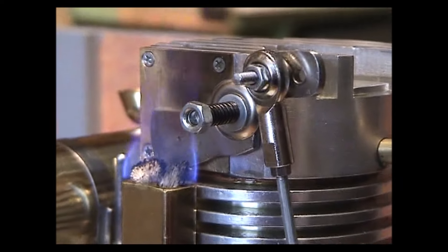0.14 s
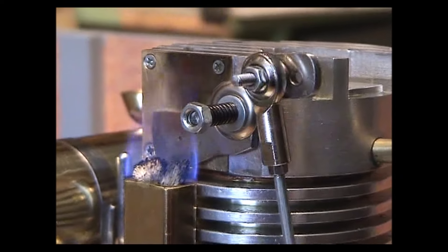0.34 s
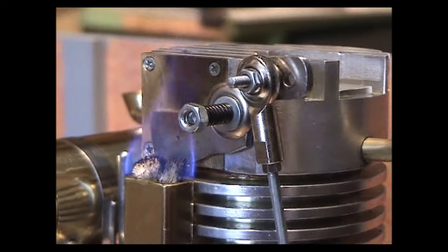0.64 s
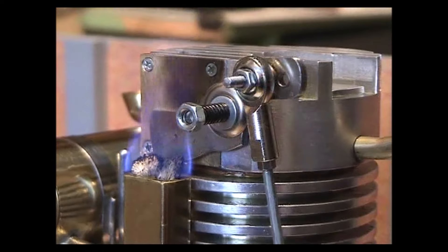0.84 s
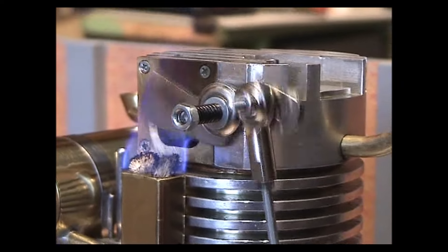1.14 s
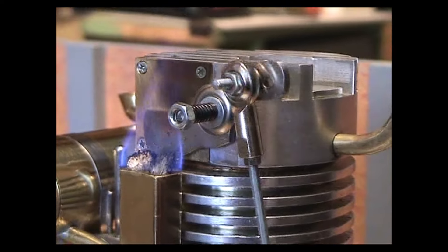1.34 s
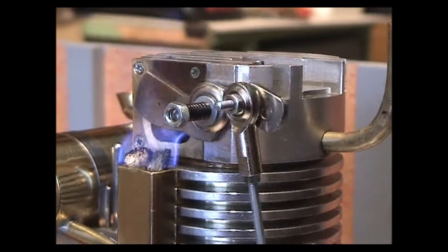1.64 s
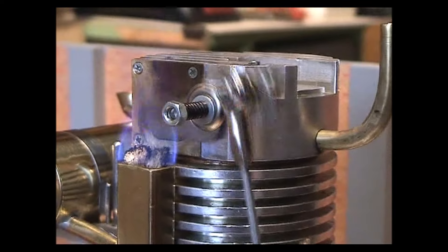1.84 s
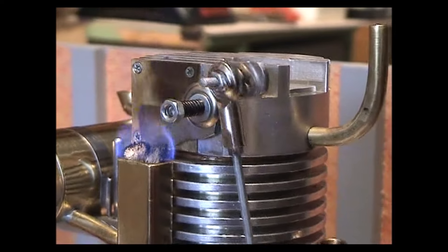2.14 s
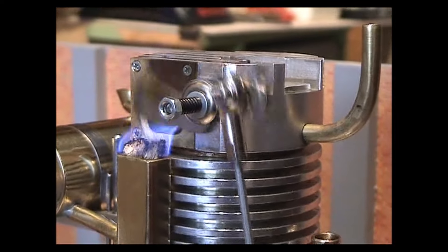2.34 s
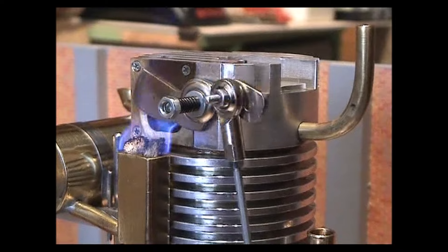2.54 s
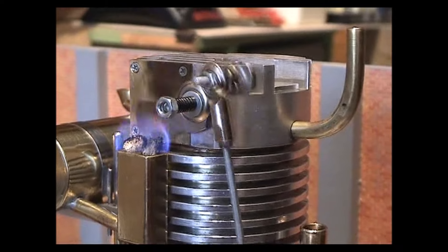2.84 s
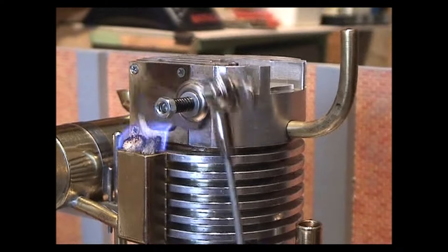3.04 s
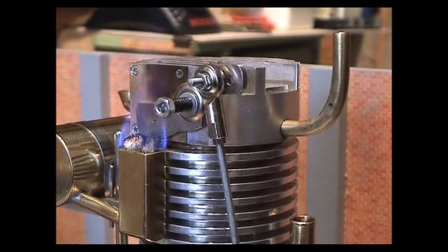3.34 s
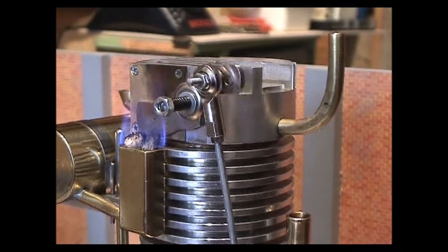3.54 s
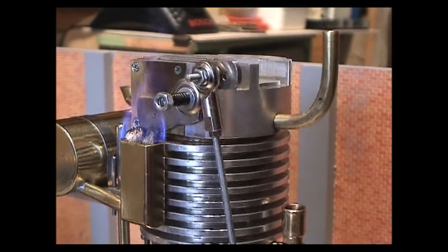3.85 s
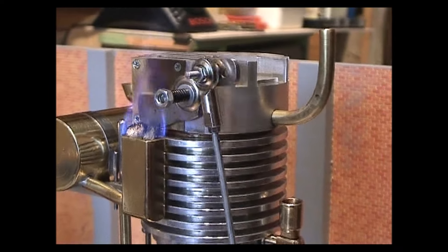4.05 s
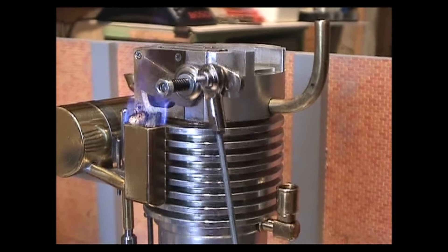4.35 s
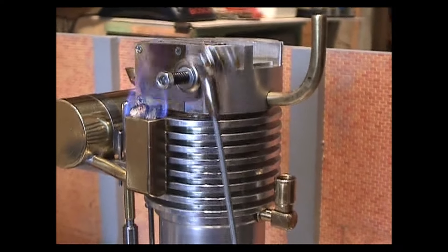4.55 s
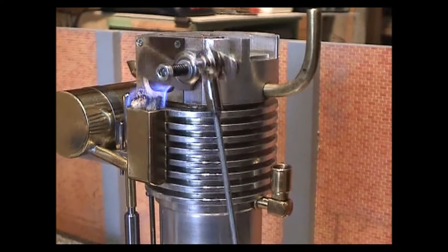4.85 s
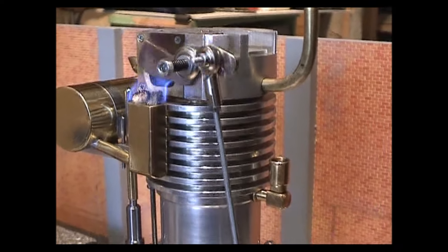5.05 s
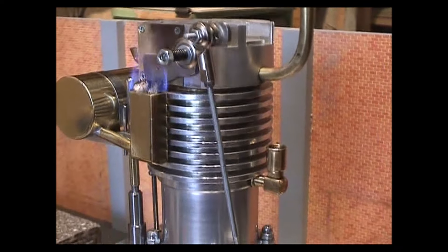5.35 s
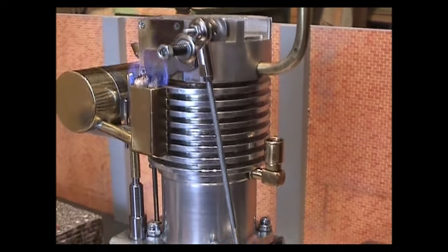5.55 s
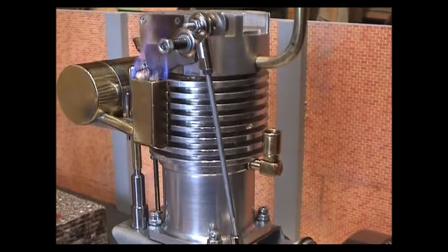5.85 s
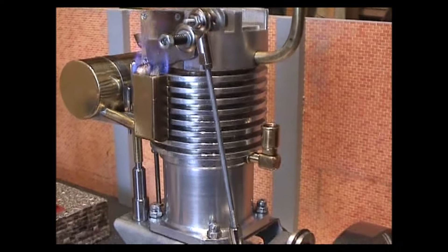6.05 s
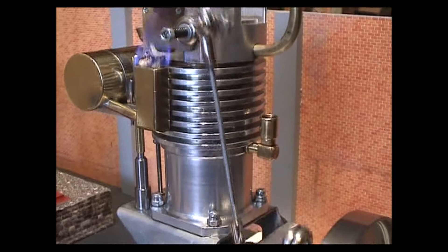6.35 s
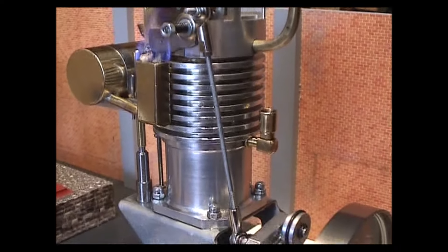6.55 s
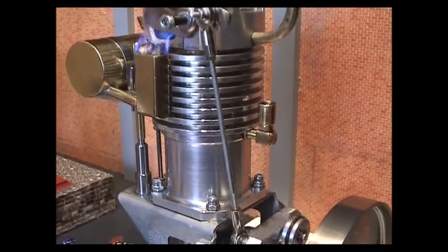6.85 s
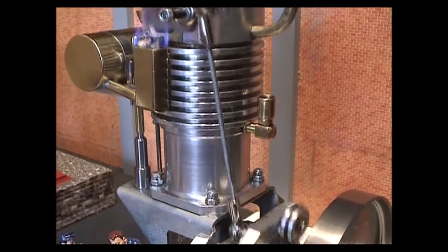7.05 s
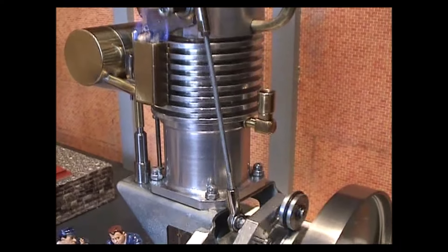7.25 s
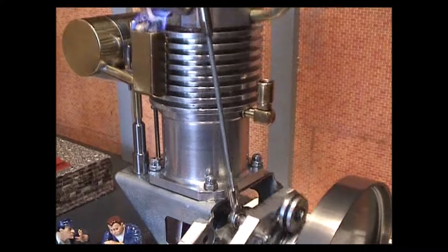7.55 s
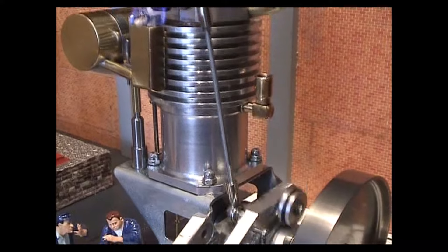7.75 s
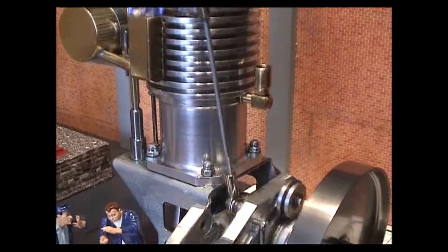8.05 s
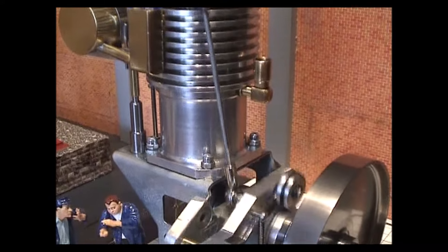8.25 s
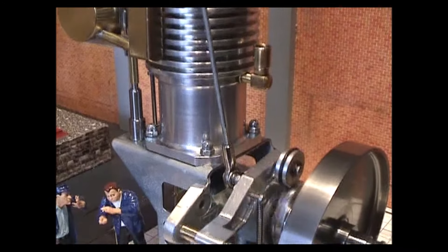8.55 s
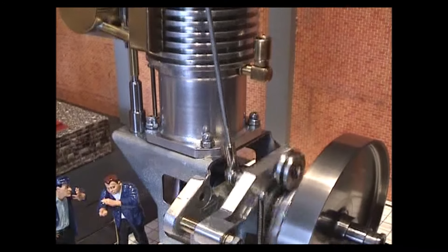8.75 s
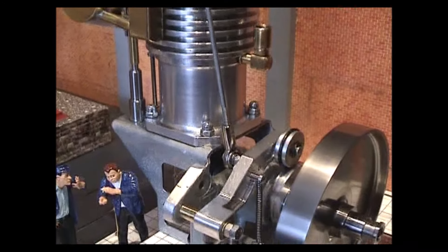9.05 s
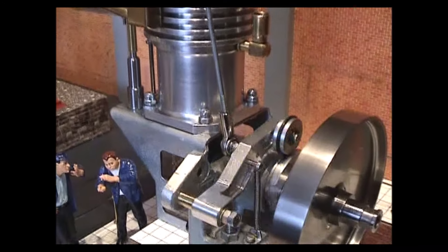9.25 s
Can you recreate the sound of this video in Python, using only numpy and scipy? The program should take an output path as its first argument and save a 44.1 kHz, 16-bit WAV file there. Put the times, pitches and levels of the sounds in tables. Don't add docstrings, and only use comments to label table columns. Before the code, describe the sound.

A small flame-sucking engine runs from start to end, close and dry in a quiet workshop. Each turn, a sharp steel valve click with a low puff alternates with a woody, metallic bearing knock, roughly four and a half cycles a second. Loose links tick faintly, air whoops softly in the port, and a tiny squeak follows. A small hard tap occasionally sounds on the bench.

```python
import sys
import numpy as np
from scipy import signal
from scipy.fft import rfft, irfft, next_fast_len
from scipy.io import wavfile
from scipy.ndimage import uniform_filter1d

SR = 44100
rng = np.random.default_rng(int(sys.argv[2]) if len(sys.argv) > 2 else 0)


def generate_wav(sig):
    pcm = np.round(np.clip(np.atleast_2d(sig).T, -1, 1) * 32767).astype(np.int16)
    wavfile.write(sys.argv[1], SR, pcm)


def invert_db(x):
    u = np.asarray(x, float) / 20
    return 10 ** u


N = 414981


def at_hz(points, hz):
    point_hz, value = np.transpose(points)
    return np.interp(np.log(hz), np.log(point_hz), value)


def rms_one(x):
    return x / np.sqrt(np.mean(x ** 2) + 1e-20)


def highpass(x, hz):
    return signal.sosfilt(signal.butter(2, hz, "high", fs=SR, output="sos"), x)


def lowpass(x, hz, order):
    return signal.sosfilt(signal.butter(order, hz, fs=SR, output="sos"), x)


def spikes(times_s, level_db):
    out = np.full(N, 1e-18)
    index = (np.asarray(times_s) * SR).astype(int)
    out[np.clip(index, 0, N - 1)] = invert_db(level_db)
    return out


def ring(x, hz, t60_s):
    r, w = invert_db(-60 / (t60_s * SR)), 2 * np.pi * hz / SR
    return signal.lfilter([0, np.sin(w)], [1, -2 * r * np.cos(w), r * r], x)


def pluck(x, hz, t60_s):
    return ring(ring(x, hz, t60_s), hz, t60_s) * 2 * np.e * np.log(1000) / (t60_s * SR)


def scatter(x, spread_s):
    r = np.exp(-1 / (spread_s * SR))
    swell = signal.lfilter([0, 2 * (1 - r) ** 1.403], [1, -2 * r, r * r], x)
    return swell * rng.uniform(-np.sqrt(3), np.sqrt(3), len(x))


def strike(times_s, level_db, modes, uneven_db, spread_s=0):
    out, luck = 0, rng.standard_normal((len(times_s), len(modes)))
    for k, (hz, mode_db, t60_s) in enumerate(modes):
        blows = spikes(times_s, level_db + mode_db + uneven_db * luck[:, k])
        if spread_s:
            blows = scatter(blows, spread_s)
        out = out + ring(blows, hz, t60_s)
    return out


def glides(times_s, level_db, hz, turns, rise_s, fall_s, octaves):
    t = np.arange(-3 * rise_s, 3 * fall_s, 1 / SR)
    shape = np.exp(-np.where(t < 0, t / rise_s, t / fall_s) ** 2)
    stretch_s = t + np.cumsum(2 ** (octaves * np.tanh(t / rise_s)) - 1) / SR
    out = np.zeros(N + len(t))
    for s, db, centre_hz, turn in zip(times_s, level_db, hz, turns):
        i = round((s + t[0]) * SR)
        out[i:i + len(t)] += invert_db(db) * shape * np.sin(2 * np.pi * (centre_hz * stretch_s + turn))
    return out[:N]


def resonate(x, peaks):
    out = 0
    for k, (hz, width_hz, level_db) in enumerate(peaks):
        r = np.exp(-np.pi * width_hz / SR)
        a = [1, -2 * r * np.cos(2 * np.pi * hz / SR), r * r]
        out = out + (-1) ** k * invert_db(level_db) * signal.lfilter([1 - r * r, 0, r * r - 1], a, x)
    return rms_one(out)


def flicker(rate_hz):
    points = rng.standard_normal(int(N / SR * rate_hz) + 2)
    return np.interp(np.arange(N) * rate_hz / SR, np.arange(len(points)), points) * 1.22


# hz, likeness_0_1
LIKENESS = [(30, 0.3), (200, 1), (1000, 0.14), (4000, 1), (14000, 0.44)]
PATCHY_DB = 2.2


def banded_noise(spectrum):
    out, edges_hz = 0, 22 * 2 ** np.arange(0, 9.6, .5)
    white = rng.standard_normal((2, 2, N))
    for k, (low_hz, high_hz) in enumerate(zip(edges_hz, edges_hz[1:])):
        hz = np.sqrt(low_hz * high_hz)
        if spectrum[0][0] < hz < spectrum[-1][0]:
            band = signal.butter(2, [low_hz, high_hz], "band", fs=SR, output="sos")
            mid, side = signal.sosfilt(band, white[k % 2])
            alike = np.clip(at_hz(LIKENESS, hz), 0, 1)
            stereo = np.sqrt(1 + alike) * mid + np.sqrt(1 - alike) * side * [[1], [-1]]
            out = out + invert_db(at_hz(spectrum, hz) + PATCHY_DB * flicker(40)) * stereo
    return rms_one(out)


# hz, level_db
FLOOR = [(15, -52), (25, -50), (127, 8), (334, 0), (394, -3), (632, -9), (839, -2.5), (1700, -6.5),
         (7000, -18), (9100, -48), (15400, -120)]


def room_air():
    return invert_db(-51) * banded_noise(FLOOR)


# time_s, crank_turns
CRANK = [(-.0736, -1), (.5855, 2), (.9262, 3.5), (1.2732, 5), (2.0868, 8.5), (2.9991, 12.5), (3.4446, 14.5),
         (4.0103, 17), (4.3555, 18.5), (4.8079, 20.5), (6.0311, 26), (7.2821, 31.5), (7.7535, 33.5),
         (8.3604, 36), (8.9481, 38.5), (9.2917, 40), (9.6282, 41.5)]


def crank_times(turn):
    s, turns = np.transpose(CRANK)
    times_s = np.interp(np.arange(turns[-1]) + turn, turns, s)
    return times_s[times_s < N / SR]


def cycle(times_s, usual, odd):
    mean, spread = np.transpose(usual)
    rows = np.c_[times_s, mean + spread * rng.standard_normal((len(times_s), len(usual)))]
    for row in odd:
        rows[np.argmin(abs(times_s - row[0])), :len(row)] = row
    return rows


# crank_turn_0_1, port_db, rub_db, hiss_db
TURN = [(0, -36, -25.5, -32.5), (0.022, -44.5, -40, -50), (.1, -36, -38.5, -50), (.2, -38.5, -45.5, -61.5),
        (0.239, -37, -41, -56), (.36, -43, -49.5, -92), (.49, -44.5, -41.5, -48.5), (.7, -45, -63.5, -64),
        (1, -50, -46, -64)]
# hz, width_hz, level_db
PORT = [(622.5, 17.6, 3.5), (690.8, 78.5, 2.5), (517, 104, -6.5)]
# hz, width_hz, level_db
RUB = [(256, 155, 5), (321, 9.1, -12), (935, 50, 2), (1162, 256, 0), (1447, 127, 1.5), (2006, 94, -3.5),
       (2390, 1360, -12), (2910, 16, -7.5)]
# hz, level_db_per_hz
HISS = [(1470, -54), (2500, 1), (3130, -1.5), (3770, -1.5), (6110, 3.5), (10000, -7), (14800, -22),
        (16000, -37)]


def running(knock_s):
    s = np.r_[2 * knock_s[0] - knock_s[1], knock_s, 2 * knock_s[-1] - knock_s[-2]]
    angle = np.interp(np.arange(N) / SR, s, np.arange(len(s))) % 1
    turn, *levels = np.transpose(TURN)
    port_db, rub_db, hiss_db = [np.interp(angle, turn, db) for db in levels]
    grain_db = 2.2 * np.minimum(rng.exponential(1, N), 3)
    grit = (rng.random(N) < 2500 / SR) * invert_db(grain_db) * rng.choice([-1, 1], N)
    air = invert_db(port_db) * resonate(rng.standard_normal(N), PORT)
    bearing_hum = invert_db(-58) * resonate(rng.standard_normal(N), RUB[4:6] + RUB[7:])
    return air, invert_db(rub_db) * resonate(grit, RUB) + bearing_hum, invert_db(hiss_db) * banded_noise(HISS)


# mean_db, spread_db
USUAL_VALVE = [(-15.5, -0.45), (-31.5, 2.5), (-30, 1)]
# start_s, click_db, tock_db
ODD_VALVES = [(0.0365, -15, -20), (.255, -12.5, -39), (0.6992, -19.5, -29), (1.1577, -14.5, -40),
              (2.0868, -17.5, -23.5), (2.9984, -14, -37), (3.2224, -17, -19.5), (3.4443, -18, -25),
              (3.898, -15, -27), (4.1248, -13, -28), (4.5822, -15, -44), (5.4747, -16.5, -35.5),
              (6.3727, -19.5, -26), (7.0558, -22.5, -24), (7.5173, -17.5, -21.5), (8.2385, -12, -26),
              (8.478, -16.5, -23.5), (8.7138, -18.5, -45), (9.177, -15.5, -42)]


def valve_strokes():
    return cycle(crank_times(-.5), USUAL_VALVE, ODD_VALVES)


# hz, level_db, t60_s
PUFF = [(133, 7.5, 0.016), (220, -23.5, 0.0095), (337, -22.5, 0.22)]
# hz, level_db, t60_s
TOCK = [(830, -2.2, 0.035), (986, -1.2, 0.02)]
# hz, level_db, t60_s
STEEL = [(3337, 7.5, 0.0073), (4567, 0, 0.0065), (5087, -6.5, 0.011), (6010, 1, 0.0041), (6424, -8, 0.0075),
         (7363, -3, 0.0051), (8970, 2, 0.0034), (10230, 5.5, 0.00097), (13400, -43, .008)]
PUFF_BEFORE_S = .004


def valve(strokes):
    s, tock_db, step_db = strokes[:, 0] - PUFF_BEFORE_S, strokes[:, 2], strokes[:, 3]
    swing = strike(s + .00044, step_db, PUFF, uneven_db=2.5)
    step = np.diff(swing, prepend=0) * SR / (2 * np.pi * 170)
    step = lowpass(step, 2000, order=1)
    leak = strike(s, step_db - 7.5, STEEL[1:4], uneven_db=2, spread_s=.00063)
    tock = strike(s + .00341, tock_db - 4.5, TOCK, uneven_db=2.5)
    return tock + leak - step


STEEL_UNEVEN_DB, HELD_SHARE, RATTLE_DB = 2.5, .42, -9


def steel(events, modes, focus_db, gain_db):
    s, level_db, bright_hz = np.transpose(events)
    out, luck = 0, rng.standard_normal((len(s), len(modes), 2))
    for k, (hz, mode_db, t60_s) in enumerate(modes):
        match_db = -np.minimum(focus_db * np.log2(hz / bright_hz) ** 2, 19)
        match_db = match_db + STEEL_UNEVEN_DB * luck[:, k, 0]
        blow_s = s - .0006 + .00038 * luck[:, k, 1]
        blows = spikes(blow_s, level_db + mode_db + match_db + gain_db)
        rattle = ring(scatter(blows, .0015), hz, t60_s)
        out = out + pluck(blows, hz, HELD_SHARE * t60_s) + invert_db(RATTLE_DB) * rattle
    return out


CLICK_HZ, CLICK_SAG_HZ_PER_S, CLICK_SPREAD_HZ = 6640, 80, 120


def valve_clicks(strokes):
    s = strokes[:, 0]
    bright_hz = CLICK_HZ - CLICK_SAG_HZ_PER_S * s + CLICK_SPREAD_HZ * rng.standard_normal(len(s))
    return steel(np.c_[strokes[:, :2], bright_hz], STEEL[1:], focus_db=21.5, gain_db=-7.5)


def tick_events(times_s, rule, odd=()):
    delay_s, scatter_s, level_db, spread_db, bright_hz = rule
    late_s = delay_s + scatter_s * rng.standard_normal(len(times_s))
    return cycle(times_s + late_s, [(level_db, spread_db), (bright_hz, .04 * bright_hz)], odd)


# delay_s, scatter_s, mean_db,
# spread_db, bright_hz
EARLY_LINK_BEFORE_VALVE = (-.031, .003, -45, 3, 5500)
LINK_BEFORE_VALVE = (-.017, .002, -44, 3, 6000)
VALVE_REBOUND = (.0138, .0012, -36, 2.5, 6430)
LINK_AFTER_KNOCK = (.0243, .0009, -29.5, 1.5, 6250)
# start_s, peak_db
ODD_REBOUNDS = [(.269, -50), (.49, -50), (1.171, -50), (1.6343, -35), (1.868, -50), (3.0103, -32),
                (3.235, -50), (4.1373, -32), (4.3668, -32.6), (4.5952, -34), (5.266, -48), (5.488, -50),
                (5.934, -44), (6.159, -44), (6.612, -46), (7.296, -48), (7.5316, -34), (7.766, -33),
                (8.0105, -32.5), (8.2528, -34), (8.962, -48), (9.191, -46)]
# start_s, peak_db
ODD_LINKS = [(0.1696, -26), (.3897, -25.5), (1.9972, -32), (2.2271, -26), (3.8086, -35), (4.036, -36),
             (4.267, -26), (4.4948, -28), (5.8323, -34), (6.967, -28.5), (7.6597, -36), (7.9023, -34),
             (8.1464, -35), (8.3878, -26.5)]
# start_s, peak_db, bright_hz
STRAY_TICKS = [
    (.1065, -44, 6200),
    (.567, -46, 6200),
    (.6934, -30, 6430),
    (1.7928, -36, 6000),
    (2.1839, -37, 3780),
    (3.2524, -35.5, 5100),
    (3.8364, -31.5, 6200),
    (7.9307, -35, 6037),
    (8.4242, -42, 4074),
    (8.7031, -41, 4000),
]


def link_ticks(knock_s, valve_s):
    ticks = np.r_[tick_events(knock_s, LINK_AFTER_KNOCK, ODD_LINKS),
                  tick_events(valve_s, LINK_BEFORE_VALVE),
                  tick_events(valve_s, EARLY_LINK_BEFORE_VALVE),
                  tick_events(valve_s[:-1], VALVE_REBOUND, ODD_REBOUNDS),
                  STRAY_TICKS]
    return steel(ticks, STEEL, focus_db=53, gain_db=.5)


# mean_db, spread_db
USUAL_KNOCK = [(-17, 1.2), (-22, -1.5), (-27.5, 3.5), (-37, 2.5)]
# start_s, thud_db, ring_db, crack_db
ODD_KNOCKS = [(0.1443, -14, -18.5, -26), (.367, -19.5, -21, -22), (0.5845, -25, -22.5, -25.5),
              (0.8109, -23.5, -21, -26), (1.0417, -18, -23.5, -28), (1.9742, -17.5, -20, -26),
              (2.4282, -21, -30, -30), (2.6593, -17.5, -20, -28), (3.3322, -17.5, -28.8, -26.5),
              (3.5581, -19, -20, -24), (3.7858, -21, -26, -26.5), (4.4708, -20, -26, -30.5),
              (4.9202, -16.5, -20, -27), (5.141, -19, -28.5, -26.5), (5.3622, -20, -26.5, -30),
              (5.586, -19, -21, -27.5), (5.8078, -21, -21.5, -26), (6.033, -21, -22, -27),
              (6.4851, -19.5, -28.5, -30), (7.1652, -23, -20.5, -27), (7.6326, -20, -46, -31.5),
              (7.8777, -18, -31, -32), (8.1216, -21, -21, -27.5), (8.8335, -16, -20.5, -26),
              (9.0636, -17, -21.5, -46), (9.2913, -15.5, -26, -34)]


def knock_blows():
    return cycle(crank_times(.005), USUAL_KNOCK, ODD_KNOCKS)


# hz, level_db, t60_s
BENCH = [(140, -54, 0.0084), (210, -42, 0.099), (259.2, 4, 0.04), (339.6, -5, 0.12), (433.4, -6.5, 0.096),
         (479.3, -13.5, 0.3), (490, -45, 0.047)]
# hz, level_db, t60_s
FRAME = [(965, -28, 0.034), (1177, -1, 0.046), (1236, -10.5, 0.066), (1480, -8, 0.028), (2214, -41, 0.01)]
# hz, level_db, t60_s
GRIT = [(1440, -8, 0.014), (2250, -3.5, 0.007), (2960, -11, 0.0039), (4190, -18.5, 0.015)]
CONTACT_HZ = 5000


def knocks(blows):
    s, thud_db, ring_db, crack_db, _ = blows.T
    soft = np.hanning(50)
    thud = strike(s + .0021, thud_db - 4, BENCH, uneven_db=2.5)
    thud = highpass(np.convolve(thud, soft / soft.sum())[:N], 110)
    clean = strike(s + .00075, ring_db - 1.5, FRAME, uneven_db=2.5)
    rattle = strike(s + .0026, ring_db - 12, FRAME + GRIT[1:2], uneven_db=3, spread_s=.0017)
    frame = lowpass(rattle - clean, CONTACT_HZ, order=2)
    crack = strike(s + .00092, crack_db - 8, STEEL, STEEL_UNEVEN_DB, spread_s=.0016)
    return thud, frame, crack


# start_s, peak_db
ODD_WHOOPS = [(1.3055, -32), (2.6927, -31), (3.5923, -19.5), (5.1753, -20), (5.3952, -46), (5.6173, -32),
              (6.2946, -19), (6.5212, -32), (7.4348, -31), (7.6693, -24.5), (8.8656, -39), (9.324, -24)]
WHOOP_AFTER_S, WHOOP_DB, WHOOP_SPREAD_DB = .0343, -24, 2.5


def port(knock_s):
    s, level_db = cycle(knock_s + WHOOP_AFTER_S, [(WHOOP_DB, WHOOP_SPREAD_DB)], ODD_WHOOPS).T
    luck = rng.random((2, len(s)))
    out = 0
    for mode_hz, _, _ in PORT[:2]:
        hz = mode_hz + 14 * (luck[0] - .5)
        out = out + glides(s, level_db - 7.5, hz, luck[1], rise_s=.012, fall_s=.013, octaves=0)
    return out


SQUEAK_AFTER_S = .0475


def slide(blows):
    s, level_db = blows[:, 0] + SQUEAK_AFTER_S, blows[:, 4]
    luck = rng.random((2, len(s)))
    hz = 1600 + 500 * luck[0]
    squeak = glides(s, level_db - 6.5, hz, luck[1], rise_s=.00508, fall_s=.0061, octaves=.482)
    squeak *= 1 + 4 * uniform_filter1d(rng.standard_normal(N), size=25)
    rustle = strike(s - .004, level_db + 3, GRIT, uneven_db=3, spread_s=.0039)
    return squeak + rustle


# start_s, peak_db, pitch_hz
TAPS = [
    (1.8791, -16.5, 1647),
    (5.8043, -29, 1770),
    (8.1713, -26.5, 2405),
]


def taps():
    out, blow = np.zeros(N), spikes([0], 0)[:SR // 5]
    for s, level_db, hz in TAPS:
        modes = [(hz, 0, .012), (hz * 1.25, -7, .014), (hz * .83, -10, .014),
                 (hz * 1.5, -12, .012), (hz * 2.65, -16, .008)]
        for mode_hz, mode_db, t60_s in modes:
            chatter = invert_db(-2) * scatter(blow, .0037) + invert_db(-11) * scatter(blow, .017)
            sound = pluck(blow, mode_hz, t60_s) + ring(chatter, mode_hz, t60_s)
            out[round(s * SR):][:len(blow)] += invert_db(level_db + mode_db) * sound
    return out


SHOP_T60_S, WALL_CUT_HZ, SHOP_DB = .18, 15000, -28.5


def workshop(x):
    size = next_fast_len(N + SR)
    w = 2 * np.pi * np.fft.rfftfreq(size, 1 / SR)
    dull = 1 / (1 + 1j * w / (2 * np.pi * WALL_CUT_HZ))
    sides = np.zeros((2, len(w)), complex)
    for k, lag_s in enumerate(rng.uniform(.0074, .029, 16)):
        trip = invert_db(-60 * lag_s / SHOP_T60_S) * dull * np.exp(-1j * w * lag_s)
        sides[k % 2] += (-1) ** (k // 2) * trip / (1 - trip)
    return invert_db(SHOP_DB) * irfft(sides * rfft(x, size), size)[:, :N]


def place(x, pan_db, lag_s=0.):
    n = np.arange(N)
    ports = [np.interp(n + side * lag_s * SR / 2, n, x) for side in (1, -1)]
    return np.array(ports) * invert_db(np.array([[pan_db], [-pan_db]]) / 2)


def scene():
    strokes, blows = valve_strokes(), knock_blows()
    valve_s, knock_s = strokes[:, 0], blows[:, 0]
    air, rub, hiss = running(knock_s)
    thud, frame, crack = knocks(blows)
    low = thud + valve(strokes)
    column = air + port(knock_s)
    middle = frame + rub + slide(blows) + taps()
    high = crack + valve_clicks(strokes) + link_ticks(knock_s, valve_s)
    direct = place(low, pan_db=-.3) + place(column, pan_db=-.6, lag_s=.0001)
    direct += place(middle, pan_db=2, lag_s=.00003) + place(high, pan_db=-.8, lag_s=.000015)
    return direct + hiss + workshop(low + column + middle + high) + room_air()


def band_limit(x):
    return signal.sosfilt(signal.butter(12, 16480, fs=SR, output="sos"), x)


def record(dry):
    bass_cut = signal.butter(2, 65, "high", fs=SR, output="sos")
    top_cut = signal.cheby2(12, 70, 16400 * 1.03, fs=SR, output="sos")
    return band_limit(signal.sosfilt(np.r_[bass_cut, top_cut], dry))


dry = scene()
out = record(dry)
generate_wav(out)
```